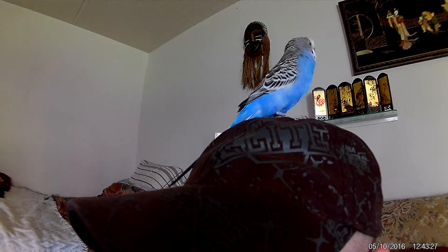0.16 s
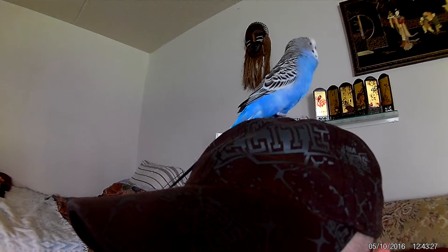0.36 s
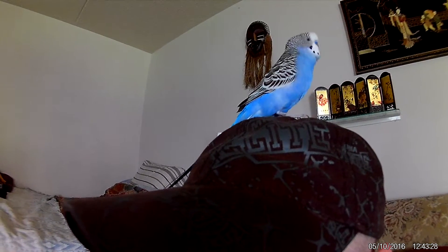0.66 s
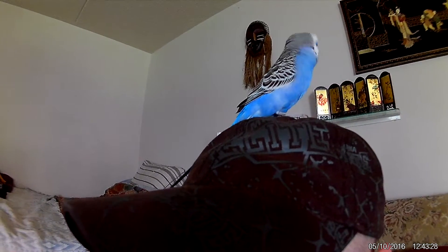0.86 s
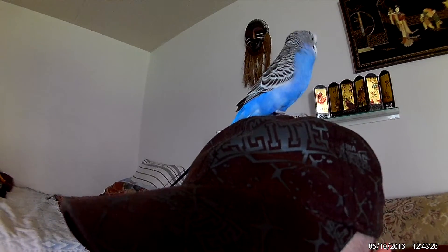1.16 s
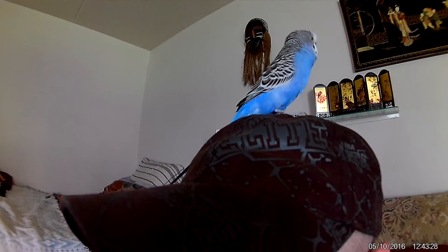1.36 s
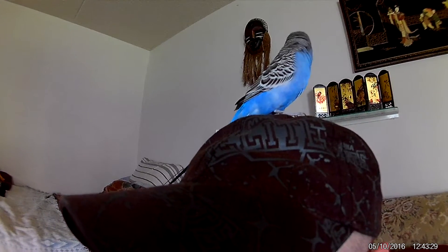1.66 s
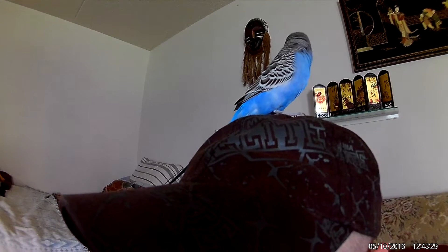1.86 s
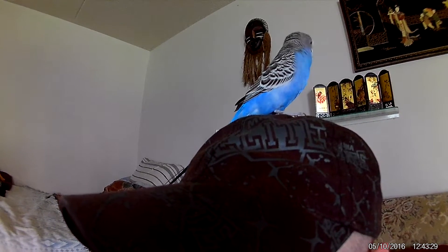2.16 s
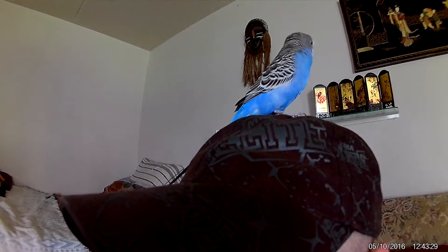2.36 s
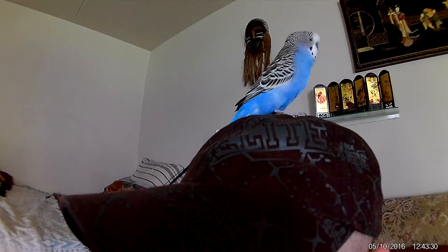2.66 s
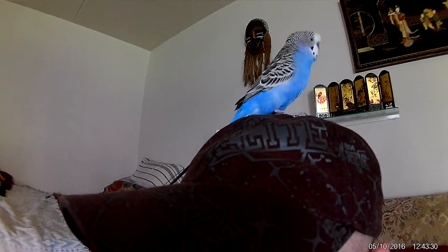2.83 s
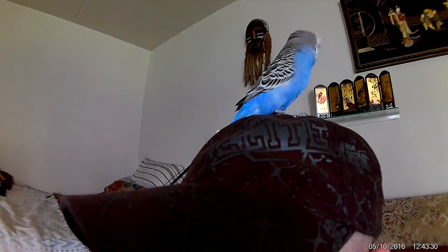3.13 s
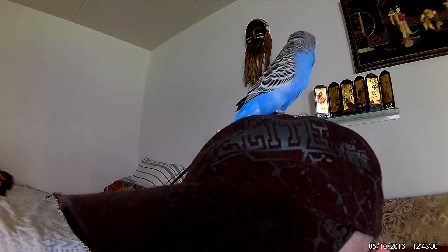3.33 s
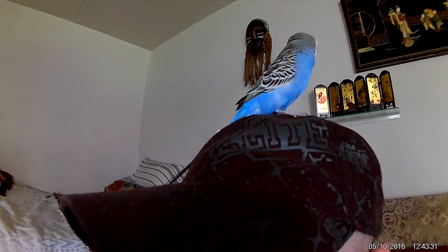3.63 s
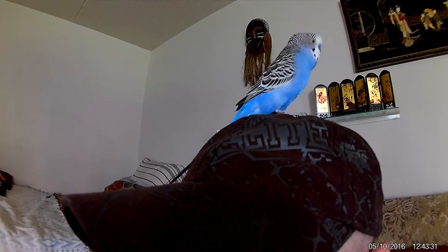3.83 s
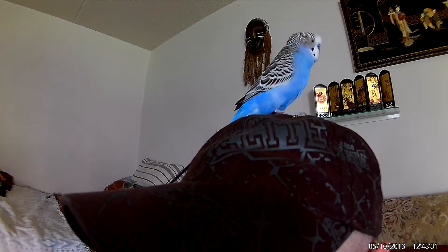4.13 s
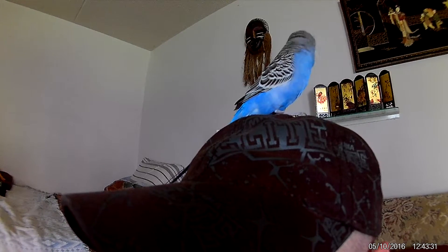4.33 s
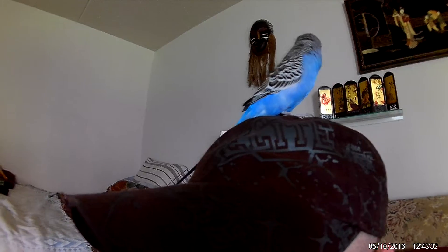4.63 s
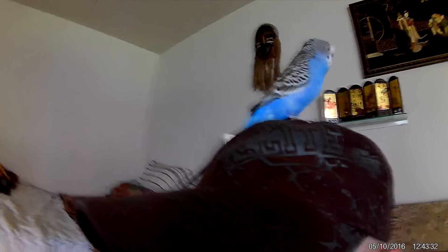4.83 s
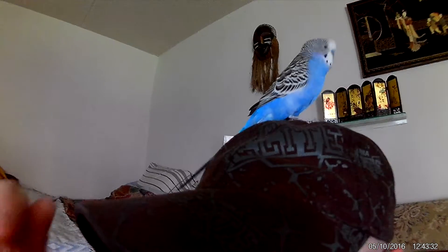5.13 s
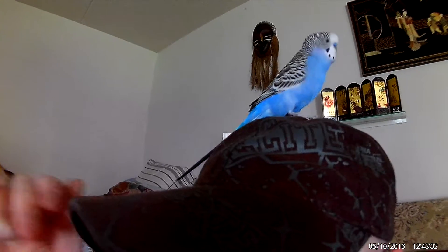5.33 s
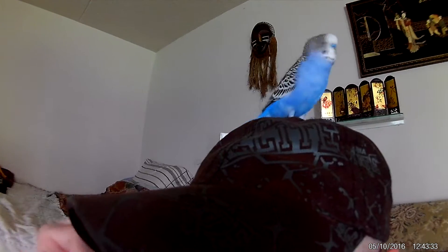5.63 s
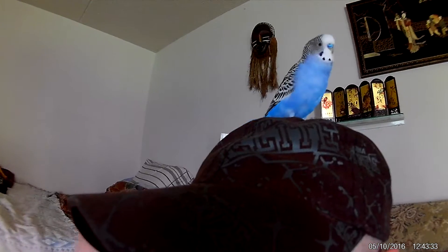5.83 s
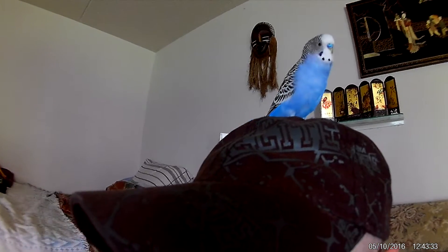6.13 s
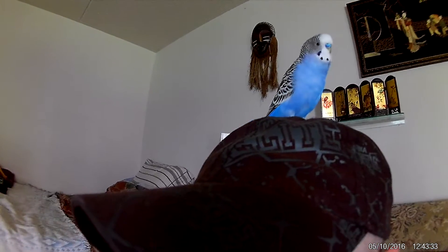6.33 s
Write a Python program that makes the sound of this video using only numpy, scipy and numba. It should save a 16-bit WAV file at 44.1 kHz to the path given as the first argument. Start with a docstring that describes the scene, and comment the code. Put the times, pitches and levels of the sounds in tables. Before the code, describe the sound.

A budgerigar sings about a metre from a small camera in a quiet, lightly echoing bedroom, over a soft low murmur, wavering hum, very thin high whine and faint treble buzz. From 0 s it pours out quick, near-pure whistles, sliding and flipping between roughly 1.5 and 4 kHz in short phrases with tiny gaps. Harsh, fluttering squawks of about a tenth of a second break in near 0.2, 1.2, 2.7 and 3.5 s. Small breathy rasps come at 0.7 and 1.8 s, with light ticks, and another rasp at 4.2 s. The warble runs on until 4.9 s, while cloth scrapes briefly on the camera around 4.6 to 4.85 s with dull bumps. A sharp tick and two raspy chirrs follow at 5.1 s, then a last whistle flurry at 5.4 to 5.5 s. At 5.8 s a faint rasp and clustered clicks, thinning until 6.1 s, leave only room murmur.

```python
"""A budgerigar a metre from a small camera in a quiet bedroom, over steady murmur, hum, whine and a faint buzz.
It sings at once: a near-sine voice slurs through whistled notes until 5.5 s. Overdriven, fluttering squawks cut in
at 0.2, 1.2, 2.7 and 3.5 s; soft rasps, pulses and breath ringing the throat, come from 0.7 s on. Beak and claw
ticks, short rings with a crack of noise, start at 1.7 s. Near 4.6-4.9 s cloth drags on the camera as snagging noise
with dull bumps. After the last notes a rasp and a run of ticks remain, from 5.8 to 6.1 s."""
import sys
import numpy as np
from scipy import signal
from scipy.fft import rfft, irfft
from scipy.io import wavfile
from scipy.ndimage import uniform_filter1d
from numba import njit

SR = 44100
rng = np.random.default_rng(int(sys.argv[2]) if len(sys.argv) > 2 else 0)


def output_pcm(signal):
    """Save a mono or channel-first signal as 16-bit PCM at the path in sys.argv[1].

    Samples are clipped to [-1, 1] before scaling.
    """
    pcm = np.clip(np.atleast_2d(signal).T, -1, 1) * 32767
    wavfile.write(sys.argv[1], SR, np.round(pcm).astype(np.int16))


N = 286209

# Whistled notes, each lasting until the next note, dip, flick or rest.
# Each row: start in seconds, pitch from in Hz, pitch to in Hz, nominal level in dB.
NOTES = [(.011, 3054, 2960, -34), (.03, 3537, 3723, -28.5), (.057, 3210, 2790, -28),
         (.061, 3450, 3560, -28), (.344, 3200, 2613, -49), (.369, 1940, 2300, -39.5),
         (.384, 2180, 1720, -44), (.391, 3120, 2820, -36.5), (.43, 1960, 1843, -40.5),
         (.447, 1883, 1753, -38.5), (.458, 2133, 1513, -39), (.486, 2230, 2930, -43),
         (.504, 2710, 2333, -36.5), (.523, 3564, 2820, -34.5), (.543, 1620, 1886, -41),
         (.558, 2130, 2045, -36.5), (.858, 3570, 3170, -56), (.872, 2745, 2490, -41.5),
         (.896, 1950, 1764, -42), (.909, 3225, 2470, -42), (.93, 2580, 2894, -37.5),
         (.951, 3890, 3100, -37), (.994, 1917, 2120, -36.5), (1.02, 2510, 2520, -36),
         (1.042, 3220, 2610, -37.5), (1.073, 2150, 1783, -36), (1.088, 1427, 1687, -46.5),
         (1.302, 3080, 2630, -43.5), (1.338, 1874, 1906, -36), (1.356, 2050, 2160, -39),
         (1.371, 2198, 1533, -45), (1.386, 3183, 2993, -53.5), (1.401, 2674, 2760, -45),
         (1.432, 1897, 2200, -42), (1.455, 1670, 1674, -44), (1.463, 2746, 2840, -58),
         (1.485, 2546, 2580, -45), (1.522, 1966, 1963, -39.5), (1.533, 3910, 3990, -44),
         (1.545, 1740, 2557, -40), (1.551, 3170, 3300, -42), (1.878, 3280, 2675, -46),
         (1.932, 2432, 2396, -46), (1.941, 1870, 1450, -49.5), (1.95, 2580, 2522, -37.5),
         (1.976, 2160, 2480, -43.5), (1.992, 1768, 1670, -46), (2.005, 1358, 1600, -49.5),
         (2.066, 2305, 3020, -46), (2.125, 2150, 2400, -46), (2.146, 2688, 2656, -44),
         (2.161, 1716, 1650, -43), (2.175, 1340, 1460, -48.5), (2.232, 1638, 1870, -52),
         (2.249, 2406, 2616, -48.5), (2.278, 2060, 2186, -48), (2.296, 1754, 1590, -44),
         (2.312, 1400, 1000, -60), (2.323, 1206, 1347, -59), (2.374, 1123, 1409, -50.5),
         (2.389, 1788, 1858, -47.5), (2.413, 1992, 1985, -47), (2.43, 1527, 1643, -46),
         (2.511, 3060, 3444, -49.5), (2.541, 2700, 2700, -32), (2.56, 2119, 2045, -31.5),
         (2.588, 2776, 2680, -35), (2.626, 3870, 2930, -34.5), (2.669, 2053, 2102, -34.5),
         (2.934, 1275, 1417, -49.5), (2.947, 4900, 1424, -50.5), (2.961, 2070, 2764, -46),
         (3.006, 3530, 2700, -44), (3.045, 3050, 1770, -44.5), (3.077, 2520, 2447, -45.5),
         (3.125, 2750, 2734, -46.5), (3.158, 1934, 2140, -42), (3.173, 2255, 1446, -43.5),
         (3.186, 1434, 1510, -55.5), (3.221, 2214, 2860, -61), (3.24, 2490, 2700, -47.5),
         (3.255, 3367, 3040, -49), (3.265, 1827, 1762, -40.5), (3.285, 1445, 1375, -58.5),
         (3.325, 1486, 2510, -59.5), (3.364, 2080, 1938, -49), (3.394, 2714, 2544, -43),
         (3.408, 1854, 1586, -47), (3.685, 2550, 2790, -42), (3.693, 3526, 3650, -44),
         (3.719, 2948, 2384, -41), (3.738, 2140, 1915, -37), (3.758, 2763, 2700, -38),
         (3.77, 2705, 3234, -30), (3.792, 4040, 3177, -32), (3.839, 2236, 1997, -37.5),
         (3.868, 2790, 2897, -38.5), (3.886, 2720, 1597, -34.5), (3.907, 1795, 1483, -45.5),
         (4.003, 3230, 3300, -53), (4.016, 1928, 1996, -41), (4.04, 1475, 1535, -51.5),
         (4.364, 2897, 2500, -51.5), (4.376, 3250, 3350, -60), (4.402, 2600, 2300, -36.5),
         (4.42, 1916, 1859, -40), (4.444, 2923, 2850, -43), (4.46, 2717, 3002, -41),
         (4.481, 3760, 3174, -37), (4.525, 1920, 1935, -39), (4.548, 1654, 1694, -46),
         (4.569, 2315, 2560, -43.5), (4.619, 2890, 2690, -41), (4.652, 1806, 2015, -41),
         (4.68, 2596, 2620, -45.5), (4.716, 3786, 3430, -48), (4.728, 3097, 2802, -38),
         (4.762, 2030, 1940, -39.5), (4.793, 2690, 2446, -42.5), (4.829, 1690, 1746, -38),
         (4.834, 3840, 3083, -49.5), (4.848, 3017, 2757, -42), (4.878, 1886, 1930, -44),
         (4.897, 2468, 1980, -54), (5.365, 1277, 1087, -54.5), (5.398, 1994, 2770, -47),
         (5.442, 2167, 3540, -43.5), (5.449, 3660, 2900, -38.5), (5.466, 3050, 2930, -39),
         (5.479, 2770, 2510, -36), (5.486, 3210, 2880, -41.5)]
# Dips, a few ms in which the voice drops into its low register.
# Each row: start in seconds, pitch to in Hz, nominal level in dB.
DIPS = [(.007, 2040, -33), (.025, 1925, -33), (.363, 1973, -42), (.418, 1927, -32.5), (0.538, 1740, -41),
        (.518, 1810, -41), (0.946, 1917, -33.5), (0.982, 2225, -34.5), (1.014, 1973, -41),
        (1.037, 2075, -35), (1.421, 2103, -46), (1.51, 1940, -37.5), (1.907, 1985, -38),
        (1.925, 1725, -38.5), (2.137, 1713, -43.5), (2.38, 1810, -48.5), (2.534, 2595, -40),
        (2.577, 2035, -34), (2.621, 2073, -30.5), (2.657, 2245, -38), (2.69, 2150, -34.5),
        (3.001, 2010, -42), (3.068, 1586, -43.5), (3.109, 2003, -49), (3.145, 1745, -40.5),
        (3.345, 1612, -46.5), (3.385, 1627, -47), (3.712, 2600, -37), (3.784, 1977, -32), (3.83, 2144, -34),
        (3.858, 1905, -39), (4.394, 2290, -39), (4.437, 1886, -45), (4.476, 2070, -34.5),
        (4.513, 1950, -35.5), (4.602, 1698, -37.5), (4.64, 2002, -40.5), (4.674, 1600, -41),
        (4.709, 2070, -40), (4.748, 2137, -35.5), (4.786, 1711, -49), (4.861, 1968, -43),
        (5.438, 1850, -36)]
# Flicks, short whistled blips, some an overtone heard while the fundamental is choked.
# Each row: start in seconds, pitch to in Hz, nominal level in dB.
FLICKS = [(0, 1852, -33.5), (0.373, 3056, -55), (.425, 1920, -34.5), (.891, 3585, -58), (.988, 2162, -42),
          (1.298, 3580, -52), (1.426, 2590, -53), (1.514, 3600, -45.5), (1.54, 1873, -39.5),
          (1.915, 3560, -51), (2.111, 3330, -50.5), (2.497, 3080, -57.5), (2.552, 2192, -39.5),
          (2.57, 3660, -39.5), (2.663, 3620, -43), (2.684, 3705, -27), (3.058, 3040, -60),
          (3.113, 3165, -63), (3.151, 2055, -59), (3.354, 2950, -49.5), (3.38, 2832, -47),
          (3.733, 3130, -37.5), (3.75, 2804, -38), (3.835, 2287, -43), (4.414, 2197, -46),
          (4.432, 3580, -51), (4.519, 2293, -36.5), (4.608, 3440, -56), (4.645, 2640, -47.5),
          (4.666, 3680, -51), (4.753, 2060, -39.5), (4.78, 2413, -42), (4.871, 3150, -44),
          (4.893, 3895, -55), (5.383, 1158, -49)]
FLICK_HZ = 3890  # where a flick starts
# Moments when the voice falls silent. Each entry: time in seconds.
RESTS = [.076, .443, 0.572, 1.066, 1.103, 1.349, 1.449, 1.568, 2.06, 2.272, 2.408, 2.443, 2.697, 3.43,
         3.854, 3.93, 4.034, 4.05, 4.544, 4.777, 4.915, 5.497]
# Overtones at 2, 3 and 4 times a note. Each entry: base level in dB relative to the note.
OVERTONES_DB = [-15, -31.5, -39.5]
# What an overtone gains in the windpipe. Each row: frequency in Hz, gain in dB.
WINDPIPE = [(2600, 1), (3200, -10.5), (3700, 1), (4300, 1), (4900, -17), (5800, -20), (6500, -12),
            (9000, -15.5)]
FLICK_HOLD, DIP_EASE, NOTE_EASE = 2.2, .7, 1.2  # powers of the glide: over 1 it lingers at its start
DIP_LAG = 0.8  # how much of the gap to the last pitch, in octaves, is left when a dip starts
ONSET_S = 0.0038  # the voice swells in after a rest
JUMP_S, JUMP_DIP = .0025, 0.24  # the voice thins for this long at a jump, by this share per octave
EFFORT_DB_PER_DB, EFFORT_REF_DB = .6, -39  # overtones grow faster than the note

# Squawks. Each row: start in seconds, rise in seconds, length in seconds, held level of the fundamental in dB,
# overtones from and to in dB relative to it, flutter from and to in Hz, centre pitch from and to in Hz,
# swing from and to in octaves, first choke 0-1, where in the swing it chokes in radians,
# beak resonance from and to in Hz, first hoarseness in octaves.
SQUAWKS = [(0.168, 0.029, 0.1, -29.5, 0.5, 9, 183.2, 181.3, 2217, 2413, 0.24, 0.52, 0.7, -.3, 4910, 4900, .1),
           (1.19, 0.017, 0.076, -33, -6, 15, 191.5, 280.3, 2897, 2003, 0.27, 0.5, 0.21, -1.7, 5530, 3640, .06),
           (2.691, 0.0095, .06, -29.5, 1, -1.5, 205, 190, 2400, 3400, 0.6, .01, 0.45, .3, 4500, 5550, 0.077),
           (3.544, 0.044, 0.093, -31.5, -9, 9, 200.5, 150.3, 1648, 2518, 0.29, 0.684, 0.04, 0, 4660, 5260, 0.297)]
SQUAWK_START_DB, SQUAWK_SWELL_DB, SQUAWK_END_DB = -13, 1, -6  # at the start, gained while held, at the end
SQUAWK_FALL_S = 0.025
SQUAWK_SKEW = .6  # the pitch falls slowly and snaps back up
SQUAWK_HISS_DB = -21  # breath around 12 kHz, relative to the overtones

# Rasps. Each row: start in seconds, rise in seconds, fall in seconds, peak in dB before the throat's gain,
# fall in dB, upper resonance in dB on top of its throat gain, mean pulse rate in Hz, unevenness 0-1,
# breathiness in dB relative to the pulses, throat shift from and to as a factor.
RASPS = [(.735, 0.0084, 0.031, -54, 17, -33, 428.4, 0.01, 24.5, 0.72, 1.3),
         (1.761, 0.0099, .017, -53, 32, -34, 192, 0.75, 17.5, 0.89, 0.9),
         (1.807, .0015, 0.035, -57.5, 14, -32, 254.2, .25, -13, 1.08, 1.02),
         (4.2141, 0.012, 0.055, -52, 3.8, 12, 319.4, 0.05, 2, 0.93, 1.36),
         (5.129, .0015, 0.029, -50, 11, 7.5, 497, .3, 4, 0.9, 1.07),
         (5.166, 0.0015, 0.052, -41.5, 27.5, 11, 447.2, 0.15, 5.5, 0.95, 1.18),
         (5.805, 0.018, .019, -54, 45, -32, 180.6, 0.64, -12, 1.1, 0.97)]
# Throat resonances, low and high. Each row: centre in Hz, width in Hz, gain in dB.
THROAT = [(1791, 920, 10.5), (3860, 445, -2.5)]
RASP_START_DB, RASP_FALL_POWER = -20, 1.75  # below the peak; over 1 the fall comes late
THROAT_WANDER = 0.07  # share of each resonance

# Beak and claw ticks. Each row: start in seconds, nominal level in dB, ring in Hz.
TICKS = [(1.715, -47.5, 704), (1.797, -40, 1760), (4.571, -33, 2360), (5.13, -27, 1810),
         (5.789, -38.5, 1190), (5.797, -39.5, 1540), (5.816, -44, 1600), (5.824, -28.5, 1720),
         (5.828, -43, 2130), (5.938, -49, 1230), (5.968, -48.5, 1490), (6.007, -41.5, 1366),
         (6.114, -49, 1010)]
EARLY_T60_S, LATE_T60_S = 0.054, 0.21
ROOM_DB = -9.5  # all the echoes together, as a gain on the direct sound

# Cloth against the camera. Each row: peak in seconds, swell in seconds, swell in dB, fade in seconds, fade in dB,
# peak in dB before the cloth's colour.
RUSTLE = [(4.571, .006, 36, 0.016, 22, -60), (4.745, .045, 12, 0.087, 1.5, -64.5),
          (4.832, .01, 12, 0.015, 15, -64)]
# Colour of the cloth noise. Each row: frequency in Hz, gain in dB.
CLOTH_COLOUR = [(150, 19), (700, 23.5), (1500, 29.5), (4500, 21), (7300, 7.5), (11000, 18), (15000, 14)]
# Dull bumps in the cloth. Each row: peak in seconds, frequency in Hz, peak in dB before the microphone port.
THUDS = [(4.572, 560, -39), (4.572, 170, -44), (4.707, 70.6, -47.5)]
# The microphone port, a deep notch near 8 kHz and a dull top. Each row: frequency in Hz, gain in dB.
PORT = [(6300, -1), (7300, -12), (7950, -38), (8600, -12), (9500, -9), (12000, -16.5), (13400, -25),
        (14400, -9.5), (15700, -29)]

# Colour of the house murmur. Each row: frequency in Hz, relative density in dB per Hz.
MURMUR = [(12, -32.5), (20, -5.5), (177, -3.5), (377, -8), (459, -13.5), (513, -13.5), (1190, -18.5),
          (7950, -38), (13200, -35.5), (16000, -36.5)]
MURMUR_DB = -60
# Wavering hum. Each row: frequency in Hz, mean level in dB, wander in Hz.
HUM = [(30.5, -70.5, 2.9), (89.5, -71.5, 2.95), (123.3, -73.5, 2.7), (181.8, -66, 4.69), (456, -75.5, 9)]
# Thin whine. Each row: frequency in Hz, mean level in dB, wander in Hz.
WHINE = [(12758, -87, 2), (12838, -86, 5)]
BUZZ_HZ, BUZZ_DB = 66.2, -88
TOP_HZ = 15720  # where the recorder cuts off


def undb(db):
    """Turn dB into an amplitude factor."""
    return 10 ** (np.asarray(db) / 20)


def level(x, db):
    """Scale to an rms level."""
    return x * undb(db) / np.sqrt(np.mean(x ** 2))


def colour(x, points):
    """Shape a spectrum by (Hz, dB) points."""
    hz, db = np.transpose(points)
    axis = np.maximum(np.arange(len(x) // 2 + 1) * SR / len(x), 1)
    return irfft(rfft(x) * undb(np.interp(np.log(axis), np.log(hz), db)), len(x))


def ring(x, hz, width_hz):
    """Two-pole resonance with gain 1 at the centre."""
    return signal.lfilter(*signal.iirpeak(hz, hz / width_hz, fs=SR), x)


@njit
def glide_ring(x, hz, width_hz):
    """Resonance whose centre moves; gain 1 at the centre."""
    y, band, low = np.empty(len(x)), 0., 0.
    for i in range(len(x)):
        g, k = np.tan(np.pi * hz[i] / SR), width_hz / hz[i]
        v = (band + g * (x[i] - low)) / (1 + g * (g + k))
        band, low, y[i] = 2 * v - band, low + 2 * g * v, k * v
    return y


def wobble(n, rate_hz):
    """Smooth chance of spread 1."""
    k = max(int(SR / rate_hz), 1)
    return level(uniform_filter1d(uniform_filter1d(rng.standard_normal(n), k), k), 0)


def span(start_s, length_s, fade_s=0.0032):
    """First sample, a short fade at both ends and the time since the start."""
    t = np.arange(int(length_s * SR)) / SR
    return int(start_s * SR), np.clip(np.minimum(t, length_s - t) / fade_s, 0, 1), t


def add(out, start, x):
    """Mix x into out."""
    out[start:start + len(x)] += x[:len(out) - start]


def song():
    """Notes, dips and flicks in order as (start s, end s, from Hz, to Hz, dB, glide power)."""
    notes = [row + (NOTE_EASE,) for row in NOTES]
    flicks = [(s, FLICK_HZ, hz, db, FLICK_HOLD) for s, hz, db in FLICKS]
    dips = [(s, None, hz, db, DIP_EASE) for s, hz, db in DIPS]
    rows = sorted(notes + flicks + dips, key=lambda row: row[0])
    last_hz = FLICK_HZ
    for k, (s, from_hz, to_hz, db, power) in enumerate(rows):
        end = min([e for e in RESTS if e > s] + [row[0] for row in rows[k + 1:k + 2]])
        # a dip sets out from near the last pitch
        yield s, end, from_hz or to_hz * (last_hz / to_hz) ** DIP_LAG, to_hz, db, power
        last_hz = to_hz


def warble():
    """One near-sine voice slurs from note to note; the windpipe lets low overtones out and holds back high ones."""
    hz, gain = np.full(N, 2000.), np.zeros(N)
    for s, end, from_hz, to_hz, db, power in song():
        a, b = int(s * SR), int(end * SR)
        glide = np.linspace(0, 1, b - a) ** power
        hz[a:b] = from_hz * (to_hz / from_hz) ** glide
        swell = np.sin(np.linspace(0, np.pi, b - a)) ** 0.088
        gain[a:b] = undb(db) * (0.65 + 0.4 * swell)
    sounding = gain > 0
    jump = np.abs(np.diff(np.log2(hz), prepend=np.log2(hz[0]))) * sounding  # octaves
    wide, onset = int(JUMP_S * SR), int(ONSET_S * SR)
    gain = gain * uniform_filter1d(1. * sounding, onset, origin=int(ONSET_S * SR / 2) - 1)
    thinning = JUMP_DIP * wide * uniform_filter1d(jump * (jump > .05), wide)
    gain = gain * (1 - np.clip(thinning, 0, .9))
    hz = uniform_filter1d(hz, int(0.002 * SR))
    hz = hz * (1 + .011 * wobble(N, 200))
    gain = uniform_filter1d(gain, int(0.00076 * SR))
    gain = gain * undb(2.2 * wobble(N, 250))
    phase = 2 * np.pi * np.cumsum(hz) / SR
    blur = hz / 6000 * wobble(N, 430)  # breath smears the high overtones
    pipe_hz, pipe_db = np.transpose(WINDPIPE)
    slack_db = 11 * np.clip((1400 - hz) / 150, 0, 1)  # slack membranes slap shut on the lowest notes
    effort_db = EFFORT_DB_PER_DB * (20 * np.log10(gain + 1e-4) - EFFORT_REF_DB)
    tone = np.sin(phase)
    for multiple, db in enumerate(OVERTONES_DB, start=2):
        through_db = db + np.interp(multiple * hz, pipe_hz, pipe_db) + slack_db * (multiple - 1)
        through_db = through_db + effort_db + 4 * wobble(N, 43)
        tone = tone + undb(through_db) * np.sin(multiple * (phase + blur))
    return np.sqrt(2) * gain * tone


def squawks():
    """The voice overdriven: its pitch swings at the flutter rate, choking once a swing, with harsh overtones."""
    out = np.zeros(N)
    for (s, rise, length, held_db, over0_db, over1_db, flutter0_hz, flutter1_hz, pitch0_hz, pitch1_hz,
         swing0, swing1, choke0, choke_at, beak0_hz, beak1_hz, hoarse) in SQUAWKS:
        start, fade, t = span(s, length)
        n = len(fade)
        db = held_db + np.interp(t, [0, rise, length - SQUAWK_FALL_S, length],
                                 [SQUAWK_START_DB, 0, SQUAWK_SWELL_DB, SQUAWK_END_DB])
        over_db = np.linspace(over0_db, over1_db, n)
        flutter_hz = np.linspace(flutter0_hz, flutter1_hz, n) * (1 + .1 * wobble(n, 150))
        cycle = 2 * np.pi * np.cumsum(flutter_hz) / SR
        swing = np.linspace(swing0, swing1, n) * np.cos(cycle + SQUAWK_SKEW * np.cos(cycle))
        octaves = swing + 0.11 * wobble(n, 300) + np.geomspace(hoarse, .07, n) * wobble(n, 1500)
        phase = 2 * np.pi * np.cumsum(np.geomspace(pitch0_hz, pitch1_hz, n) * 2 ** octaves) / SR
        choke = 1 - np.geomspace(choke0, .25, n) * np.cos(cycle - choke_at)  # its depth drifts to .25
        upper = np.sin(2 * phase) + 0.35 * np.sin(3 * phase) + 0.32 * np.sin(4 * phase)
        upper = upper * undb(1.2 * wobble(n, 830))
        beak = glide_ring(upper, np.geomspace(beak0_hz, beak1_hz, n), 648.0)  # the open beak resonates
        upper = beak + 0.56 * ring(upper, 6200, 1200) + 0.45 * upper
        hiss = ring(ring(rng.standard_normal(n), 12000, 6070), 12000, 6070)
        upper = level(upper, 0) + level(hiss, SQUAWK_HISS_DB)
        fundamental = level(np.sin(phase) * choke * undb(1.2 * wobble(n, 400)), 0)
        voice = fundamental + undb(over_db) * level(upper * choke, 0)
        add(out, start, voice * undb(db) * fade)
    return out


def rasps():
    """Uneven pulses, each with a puff of breath, ring the throat."""
    out = np.zeros(N)
    for s, rise, fall, peak_db, fall_db, upper_db, rate_hz, uneven, breath_db, shift0, shift1 in RASPS:
        start, fade, t = span(s, rise + fall, fade_s=0.0003)
        n = len(fade)
        rise_db = RASP_START_DB * np.clip(1 - t / rise, 0, 1)
        db = peak_db + rise_db - fall_db * np.clip((t - rise) / fall, 0, 1) ** RASP_FALL_POWER
        cycle = np.cumsum(rate_hz * 2 ** (uneven * wobble(n, rate_hz))) / SR
        pulses = np.diff(np.floor(cycle), prepend=-1) * undb(16 * uneven * rng.standard_normal(n))
        puff = np.exp(-(cycle % 1) / 0.28) * rng.standard_normal(n)
        drive = level(pulses, 0) + level(puff, breath_db)
        bands = []
        for hz, width_hz, gain_db in THROAT:
            moving_hz = hz * np.linspace(shift0, shift1, n) * (1 + THROAT_WANDER * wobble(n, 220))
            band = glide_ring(drive, moving_hz, 1. * width_hz)
            bands.append(level(glide_ring(band, moving_hz, 2. * width_hz), gain_db))
        low, high = bands
        add(out, start, (low + undb(upper_db) * high) * undb(db) * fade)
    return out


def ticks():
    """Each tick is a short ring with a dull crack of noise over it."""
    out, t = np.zeros(N), np.arange(400) / SR
    for s, db, hz in TICKS:
        push = t / 0.00055 * np.exp(1 - t / 0.0006)
        crack = ring(ring(rng.standard_normal(400), 2300, 1260), 2300, 1260)
        add(out, int(s * SR), undb(db) * push * (np.sin(2 * np.pi * hz * t) + 1.43 * crack))
    return out


def room(x):
    """Quick echoes off the near wall and bedding, then the softer tail of a small furnished room."""
    t = np.arange(int(.6 * SR)) / SR
    early, late = rng.standard_normal((2, len(t))) * np.clip((t - .003) / 0.00082, 0, 1)
    early = ring(early, 2600, 4000) * undb(-60 * t / EARLY_T60_S)
    late = 0.604 * ring(late, 5900, 22000) * undb(-60 * t / LATE_T60_S)
    tail = early + late
    return x + signal.fftconvolve(x, tail * undb(ROOM_DB) / np.sqrt(np.sum(tail ** 2)))[:N]


def cloth():
    """Dense fibre snags drag over the camera body, with dull bumps."""
    out = np.zeros(N)
    for s, swell, swell_db, fall, fall_db, peak_db in RUSTLE:
        start, fade, t = span(s - swell, swell + fall)
        db = peak_db + np.interp(t, [0, swell, swell + fall], [-swell_db, 0, -fall_db])
        n = len(fade)
        snags = rng.standard_normal(n) * undb(3.6 * wobble(n, 700) + 2.0 * wobble(n, 74.0))
        add(out, start, snags * undb(db) * fade)
    out = colour(out, CLOTH_COLOUR)
    for s, hz, db in THUDS:
        cycles = np.arange(-2000, 2000) / SR * hz
        bump = np.cos(2 * np.pi * cycles) * np.exp(-(cycles / .7) ** 2)
        add(out, int(s * SR) - 2000, undb(db) * bump)
    return out


def background():
    """House murmur, wavering hum, a thin whine and a faint ticking buzz in the treble."""
    t = np.arange(N) / SR
    out = level(colour(rng.standard_normal(N), MURMUR), MURMUR_DB)
    for hz, db, wander_hz in HUM + WHINE:
        phase = 2 * np.pi * np.cumsum(hz + wander_hz * wobble(N, 11.94)) / SR
        out = out + np.sqrt(2) * undb(db + 1.2 * wobble(N, 3.6)) * np.sin(phase)
    cycle = t * BUZZ_HZ
    strengths = undb(3.5 * rng.standard_normal(N // 400))  # one for each tick of the buzz
    gate = np.exp(-(cycle % 1) / .04) * strengths[cycle.astype(int)]
    buzz = ring(ring(gate * rng.standard_normal(N), 10000, 1400), 10000, 1400)
    return out + level(buzz, BUZZ_DB)


def scene():
    """The bird in its room and the cloth pass the microphone port; the background is laid under them."""
    bird = room(warble() + squawks() + rasps() + ticks())
    return (colour(bird + cloth(), PORT) + background())[None]


def record(dry):
    """The recorder cuts the top steeply."""
    return signal.sosfilt(signal.ellip(12, .2, 70, TOP_HZ, fs=SR, output="sos"), dry)


dry = scene()
out = record(dry)
output_pcm(out)
```